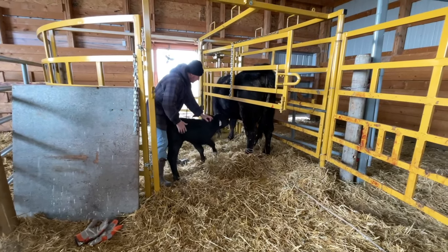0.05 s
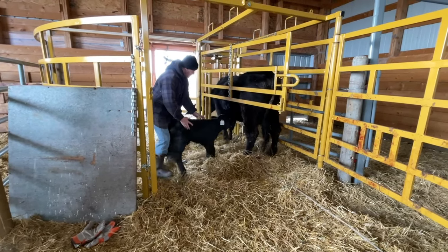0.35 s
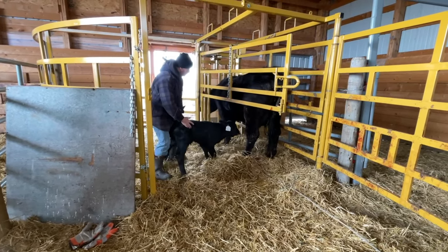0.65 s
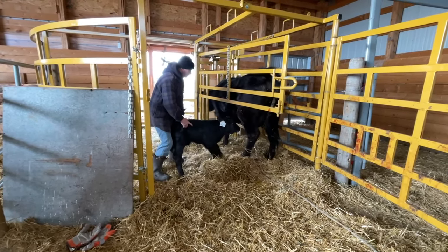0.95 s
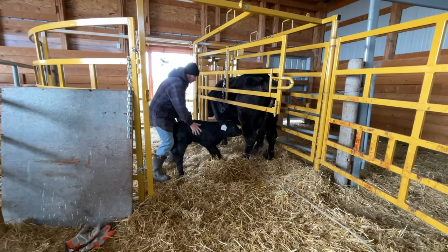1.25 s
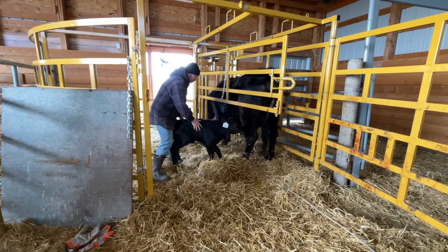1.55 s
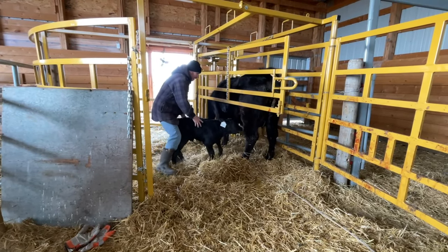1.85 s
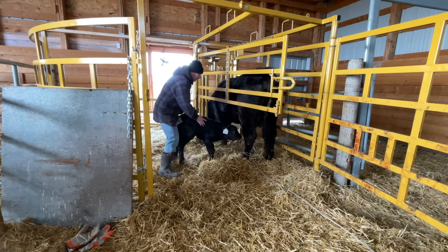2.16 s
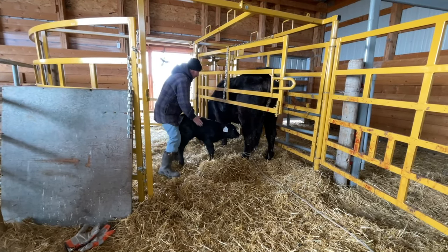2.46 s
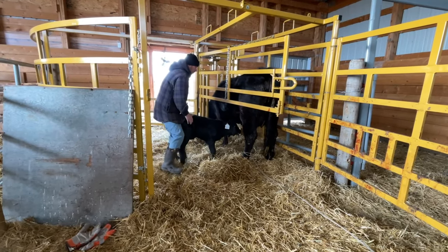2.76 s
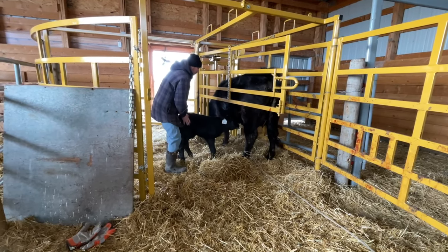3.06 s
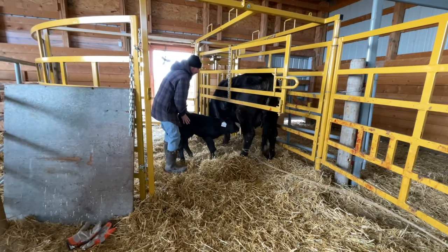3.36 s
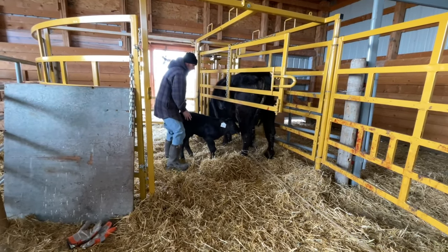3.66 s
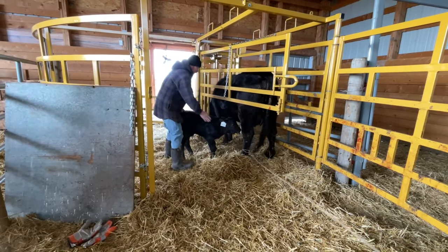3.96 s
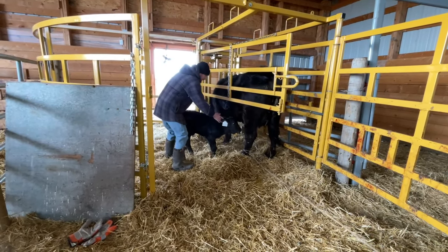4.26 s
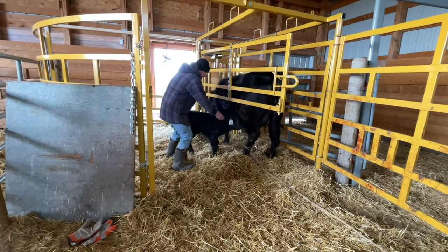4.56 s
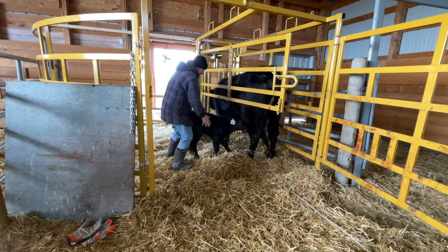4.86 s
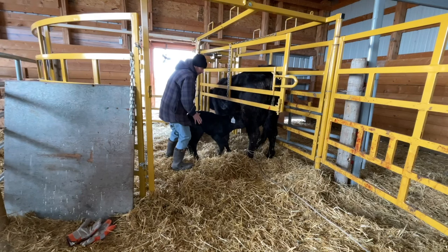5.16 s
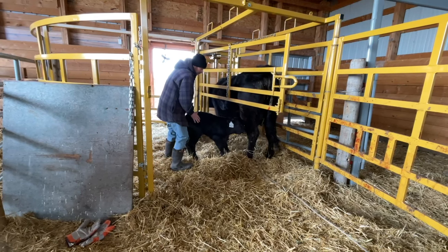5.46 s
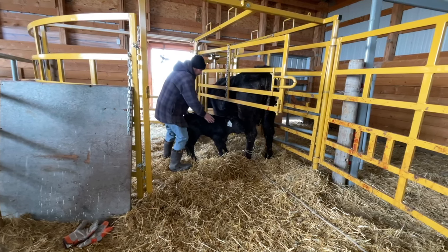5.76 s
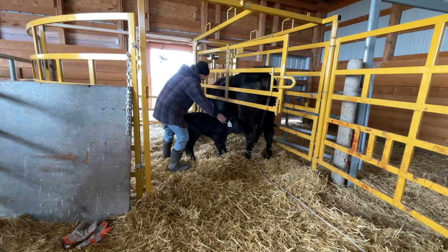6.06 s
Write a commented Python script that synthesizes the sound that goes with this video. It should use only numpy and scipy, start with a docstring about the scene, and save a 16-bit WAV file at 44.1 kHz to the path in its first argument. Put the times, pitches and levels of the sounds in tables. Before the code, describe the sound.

Irregular ringing clanks from a metal pen gate, with dull hoof thuds, crunching straw and a swishing coat in a barn.

```python
"""A tubular steel gate clanks, booms and jingles its chain as a penned cow shifts against it,
a few metres from a stereo microphone in a wooden barn. Each blow rattles the joints and rings the tubes.
A person nudges a calf towards the cow: boots and hooves thud and stir the straw, a coat swishes,
and a hinge squeaks briefly. Far birds chirp faintly over a low hum and the air of the barn."""
import sys
import numpy as np
from scipy import signal
from scipy.fft import rfft, irfft, next_fast_len
from scipy.io import wavfile

SR = 44100
rng = np.random.default_rng(int(sys.argv[2]) if len(sys.argv) > 2 else 0)


def persist_wave(psi):
    """Save psi, clipped to +-1, as 16-bit WAV."""
    counts = np.round(np.clip(psi, -1, 1) * 32767).astype(np.int16)
    wavfile.write(sys.argv[1], SR, np.atleast_2d(counts).T)


N = 273861
TIME = np.arange(N) / SR
RING_TIME = TIME[:SR * 2 // 3]  # seconds since a blow

# steel knocks on steel: start_s, strength_db, weight_db (extra bass), hardness_db (extra treble), part_hz
CLANKS = [(0.352, -54, 5.5, 11.5, 1330), (0.55, -31, -1.5, -7, 3000), (0.556, -24, 7.5, 0, 1465),
          (0.578, -39, 13, 8, 1572), (0.831, -44, -16.5, -6, 2337), (0.915, -40.5, 8, -0.5, 4100),
          (1.005, -40, 4.5, -13, 1470), (1.124, -36, 10, -14, 1430), (1.147, -30, -6, -6.5, 2210),
          (1.794, -39, 4.5, 8, 4000), (1.801, -30, -5.5, -3, 5160), (1.858, -34, 2.5, -3.5, 5560),
          (2.035, -47.5, 10.5, 0.5, 2330), (2.958, -36.5, -1, -11.5, 5170), (3.038, -39.5, -1, 2.5, 1470),
          (3.330, -36.5, -3.5, 3.5, 4110), (3.476, -38.5, 4, 1, 2910), (4.274, -32.5, -6, -4.5, 6700),
          (4.302, -38, -3.5, 8.5, 4980), (4.317, -34.5, -1.5, -2, 3680), (4.344, -35.5, 8, -3, 2400),
          (4.384, -29.5, 5.5, -9, 10400), (4.396, -37, 13.5, -16.5, 3880), (4.71, -40, 8, -0.5, 674),
          (5.226, -52, 1, 3, 3200), (5.668, -62, 10, 4, 1100)]
# the spectrum all clanks share, per octave band: frequency_hz, level_db
STEEL_SPECTRUM = [(60, -47.5), (200, -25.5), (520, -18.5), (850, -13), (2100, -2), (4300, 0.5), (6000, 0),
                  (9500, -7), (14000, -10.5)]
# where a blow's weight acts: frequency_hz, share
WEIGHT_SHARE = [(850, 1), (2100, 0)]
# where a blow's hardness acts: frequency_hz, share
HARDNESS_SHARE = [(2100, 0), (4300, .35), (9500, 1)]
# stronger blows leave the joints rattling longer: strength_db, t60_s
RATTLE_DECAY = [(-59, 0.042), (-52, 0.098), (-19.5, 0.15)]
# modes of the gate's tubes: pitch_hz, level_db, t60_s
TUBE_MODES = [(409, -8, 0.82), (773, 2.5, 0.47), (803, -0.5, .35), (878, -5, 0.06), (1270, 2, 0.33),
              (1452, -1.5, 0.5), (1495, 4, 0.17), (2170, 2, 0.25), (2337, -1.5, 0.6), (3580, -8, 0.37),
              (3812, -13.5, 0.25), (4340, -6, 0.49), (4912, -11, 0.49)]
# the gate's colour across the stereo image: frequency_hz, left_minus_right_db
GATE_BALANCE = [(500, -1.5), (1500, 1), (2400, -1.5), (4000, 4.5), (8000, 1), (12000, -2)]
# sudden contacts crack or tap: start_s, level_db, low_hz, high_hz, t60_s, left_minus_right_db
CRACKS = [(0.556, -12.5, 620, 1310, .025, -1.5), (0.556, -5.5, 3600, 5000, 0.016, 0),
          (0.585, -14, 630, 1030, 0.012, 8.5), (0.831, -24.5, 1800, 4800, .03, -9),
          (1.076, -27, 845, 1860, 0.11, -2), (1.148, -22, 1200, 3200, 0.11, -2),
          (1.147, -25, 6000, 13300, .02, 1), (1.801, -30, 5000, 12500, 0.027, -2),
          (3.036, -36, 5500, 13000, 0.013, 1), (3.328, -25.5, 3760, 6400, 0.07, 2),
          (3.333, -39.5, 1170, 1790, 0.35, -6), (3.613, -28.5, 560, 1080, 0.072, -0.5),
          (4.273, -22.5, 720, 5230, 0.04, -3), (4.383, -16.5, 6500, 13000, 0.015, -4),
          (4.396, -15.5, 437, 970, 0.015, 6), (4.394, -18, 3570, 4200, 0.022, 2),
          (4.709, -9.5, 4230, 11700, 0.026, -1.5), (4.716, -32, 635, 1520, 0.14, -10),
          (4.748, -25, 617, 1050, 0.076, 10), (6.004, -47.5, 492, 1120, 0.25, 1)]
# modes of the loose steel parts, by part name: pitch_hz, level_db, t60_s
PART_MODES = {"two-tone": [(3282, 0, 0.52), (4177, 1.5, 0.38)], "pure": [(3759, -1, 0.65), (3615, -14, .8),
              (5219, -15, .4)], "hook": [(2335, 0, 0.2)], "bolt": [(4890, 0, .2), (6850, -2, .18),
              (5700, -2, .16)], "bar": [(1440, 0, .25)], "staple": [(4183, 0, .3), (3282, -10, .3)],
              "post": [(775, 0, .35), (2315, 2, .22), (4183, -5, .2), (4290, -4, .5), (4915, -11, .55)],
              "latch": [(1717, -13, .37), (3085, -10, .18), (3960, -4, .14), (4070, 0, .18),
              (4533, -13, .38), (5227, -4, .18)], "shackle": [(4285, -8, .6), (5620, 0, .18),
              (6928, -1, .26), (11080, -4, .14), (11430, -6, .25)], "pin": [(1922, -2, .3), (7720, -2, .25),
              (8010, -2, .2), (8161, 0, .33), (9426, -3, .35), (9560, -3, .2)]}
# the chain and latch jerk: start_s, part_name, level_db, free_swing_s
CHAIN_AND_LATCH_CLINKS_AGAINST_THE_GATE = [(0.554, "hook", -16, 0.034), (0.556, "post", -26, .25),
                                           (0.831, "pure", -37.5, .2), (0.831, "hook", -35.5, .05),
                                           (0.913, "staple", -31.5, 0.08), (1.801, "pure", -25, 0.45),
                                           (1.801, "two-tone", -49, 0.053), (1.857, "two-tone", -32, 0.18),
                                           (2.032, "two-tone", -46, 0.12), (2.048, "hook", -40.5, .06),
                                           (2.964, "pure", -35.5, 0.29), (3.04, "pure", -39.5, .14),
                                           (3.045, "two-tone", -33.5, 0.2), (3.329, "latch", -30, 0.092),
                                           (3.482, "two-tone", -36.5, .16), (4.275, "hook", -33, .09),
                                           (4.275, "bolt", -39, .03), (4.303, "bolt", -32, .06),
                                           (4.312, "two-tone", -30, 0.03), (4.335, "pure", -29, 0.082),
                                           (4.343, "bar", -29, 0.04), (4.71, "shackle", -39.5, .2),
                                           (5.226, "pin", -48.5, .12)]
# dull blows of hooves and bodies on floor and pen: start_s, level_db, pitch_hz, t60_s
THUDS = [(0.0, -48.5, 300, 0.14), (0.399, -36.5, 176, 0.14), (0.583, -29.5, 295, 0.43),
         (0.592, -33, 186, 0.2), (1.140, -42.5, 300, 0.99), (1.223, -43, 245, 0.13), (1.524, -45, 86, 0.14),
         (1.811, -40, 159, 0.4), (1.874, -35.5, 153, 0.12), (2.046, -45, 115, 0.28),
         (2.882, -37.5, 290, 0.13), (2.897, -30, 191, 0.12), (3.418, -35.5, 205, 0.29),
         (3.480, -39.5, 80.4, 0.17), (3.615, -44, 218, 0.5), (4.396, -32.5, 216, 0.38),
         (4.402, -32.5, 385, 0.34), (4.786, -31.5, 86, 0.091), (4.894, -34, 265, 0.28),
         (5.119, -47, 253, 0.18), (5.678, -54, 270, 0.3)]
# low resonances of the pen and floor: centre_hz, width_hz, level_db
PEN_RESONANCES = [(76, 26.6, 2.5), (167, 81, 1.5), (245, 77, -4), (330, 40, -23.5), (392, 69, -5)]
# how busily the feet stir the bedding: time_s, level_db
STIR = [(0.0, -52), (0.4, -60.5), (0.76, -45.5), (1.19, -41.5), (1.35, -52.5), (1.64, -47.5), (1.93, -46.5),
        (2.68, -57.5), (3.4, -52.5), (3.52, -46.5), (3.99, -50.5), (4.32, -48.5), (4.44, -63), (4.8, -42),
        (4.97, -56.5), (6.2, -64)]
# a boot or hoof sinks into the straw or drags through it: start_s, level_db, length_s, t60_s
TREADS = [(0.06, -48, 0.025, 0.21), (0.337, -45.5, 0.033, 1.5), (1.136, -33, 0.017, 0.96),
          (2.28, -51, 0.069, 1.7), (2.905, -47, 0.096, 0.61), (3.604, -42.5, 0.024, 1.3),
          (4.396, -31, 0.034, 0.55), (4.75, -42, 0.034, 0.54), (5.142, -52.5, .03, 2.06),
          (5.746, -62.5, 0.028, 0.78)]
# the stalks on top: frequency_hz, level_db
CRUNCH_SPECTRUM = [(300, 0.5), (750, 12.5), (1300, 8.5), (2200, 6.5), (3200, -0.5), (6000, -20.5)]
# the bedding below: frequency_hz, level_db
SHUFFLE_SPECTRUM = [(40, 0.5), (90, -3), (180, 4.5), (380, -1), (550, -23.5), (1200, -27)]
# the coat brushes past with each move of arm or body: start_s, length_s, end_level_db
COAT_STROKES = [(0.0, 0.0066, -41), (0.059, 0.33, -39.5), (0.74, .23, -44.5), (1.278, 0.23, -42.5),
                (1.622, 0.3, -42.5), (1.936, 0.24, -46.5), (2.452, 0.31, -57), (2.703, 0.16, -46),
                (3.09, 0.22, -50.5), (3.572, 0.11, -46.5), (3.67, 0.17, -50.5), (3.898, 0.21, -52),
                (4.578, 0.22, -44.5), (5.094, 0.23, -52), (5.297, 0.093, -50.5), (5.7, 0.32, -67.5)]
# rubbing cloth: frequency_hz, level_db
COAT_SPECTRUM = [(1500, -11), (3200, -6.5), (4800, -2), (7000, -8), (8300, -7), (9600, -2), (12000, -10),
                 (13500, 0)]
# single stalks snap: start_s, level_db, centre_hz
STALK_SNAPS = [(2.047, -29, 9500), (2.117, -47, 5300), (2.144, -48, 10000), (4.965, -47, 10500),
               (5.032, -45, 9000), (5.205, -50, 10500), (5.398, -42, 10000)]
# the pulses of the hinge's squeak: start_s, length_s, pitch_hz, level_db
SQUEAKS = [(1.548, 0.025, 673, -42), (1.605, 0.038, 664, -45.5), (1.677, 0.098, 678, -53.5)]
# far birds, and at the end a faint squeak near 2 kHz: start_s, length_s, start_hz, end_hz, level_db
CHIRPS = [(0.471, 0.06, 4650, 4800, -49), (4.122, 0.04, 3720, 3390, -56.5),
          (5.452, 0.041, 4300, 4820, -57.5), (5.515, 0.09, 3180, 3480, -60),
          (5.784, 0.085, 1963, 2130, -61)]
# the hum's two tones: pitch_hz, level_db
HUM_TONES = [(75, -62.5), (150.5, -71.5)]
# the hum swells and sinks: time_s, gain_db
HUM_SWELL = [(0, 3), (1.2, -1), (1.8, 4), (2.35, 2.5), (2.75, -6), (3.5, 4.5), (4.1, -4.5), (5.3, -3.5),
             (6.2, 4)]
# the barn's room tone: frequency_hz, level_db
AIR_SPECTRUM = [(20, -38), (45, 5.5), (70, 0.5), (110, -15), (300, -11), (1000, -43), (4000, -55.5),
                (13000, -53)]
# reverberation between the timber walls: frequency_hz, t60_s
BARN_DECAY = [(100, 0.51), (500, 0.79), (2000, 0.58), (5000, 0.48), (12000, 0.21)]
# the microphone's response: frequency_hz, gain_db
MIC_RESPONSE = [(30, -11), (70, 1), (5800, 0.5), (7000, 3), (10500, 3.5), (12000, 2.5), (13400, -4),
                (14300, -38.5)]


def gate(burst_db=11, burst_t60=0.016, rattle_db=1.97, tubes_db=-13):
    """Each clank, a few metres off: a burst, a rattle of loose joints, and ringing parts and tubes."""
    contacts, rings = np.zeros(N), np.zeros((2, N))
    for start, *blow in CLANKS:
        strength, weight, hardness, _ = blow
        rattle = amp(rattle_db) * fade(np.interp(strength, *np.transpose(RATTLE_DECAY)))
        rise_s = 0.00091 * 2 ** (-min(hardness, 0) / 11)  # a softer contact builds up more slowly
        force = (rattle + amp(burst_db) * fade(burst_t60)) * rise(rise_s)
        response = lambda hz: amp(clank_db(hz, *blow)) * np.sqrt(SR / (2 * np.log(2) * hz))
        add(contacts, start, filtered(grains(len(RING_TIME), spread_db=3.5) * force, response))
        add(rings, start, loose_part(blow))
        # a heavy blow rings the tubes more; a soft one spares their high modes
        tubes = sum(amp(db + min(hardness, 0) * along(HARDNESS_SHARE, hz)) * mode(hz, t60)
                    for hz, db, t60 in TUBE_MODES)
        add(rings, start, amp(tubes_db + strength + weight) * tubes)
    sound = barn(contacts, wet_db=10, build_s=0.0008) + rings
    return filtered(sound, lambda hz: amp(np.outer([.5, -.5], along(GATE_BALANCE, hz))))


def clank_db(hz, strength, weight, hardness, part_hz, part_db=7, part_width=0.16):
    """A blow's spectrum: heavy ones add bass, hard ones treble, and the struck part its resonance."""
    tilt = weight * along(WEIGHT_SHARE, hz) + hardness * along(HARDNESS_SHARE, hz)
    resonance = part_db / (1 + (np.log(hz / part_hz) / part_width) ** 2)
    return strength + along(STEEL_SPECTRUM, hz) + tilt + resonance


def loose_part(blow, overtone_db=-12, note_db=-10, t60=.18):
    """A struck bolt, hook or link rings briefly with its own note and a scatter of high overtones."""
    part_hz = blow[-1]
    overtones = np.exp(rng.uniform(np.log(3000), np.log(13000), 12))
    ring = sum(amp(overtone_db + clank_db(hz, *blow)) * mode(hz, t60) for hz in overtones)
    return ring + amp(note_db + clank_db(part_hz, *blow)) * mode(part_hz, t60)


def mode(hz, t60):
    """One mode of struck steel, reaching left and right in different phases."""
    phase = rng.uniform(0, 2 * np.pi) + np.array([[0], [np.pi / 3]])
    return np.sin(2 * np.pi * hz * RING_TIME + phase) * fade(t60) * rise(0.00057)


def cracks():
    """The first instant of a hard contact: a compact burst that arrives ahead of the walls' answer."""
    out = np.zeros((2, N))
    for start, db, low_hz, high_hz, t60, pan_db in CRACKS:
        band = signal.butter(3, [low_hz, high_hz], "bandpass", fs=SR, output="sos")
        noise = rng.standard_normal(len(RING_TIME)) * fade(t60) * rise(0.000094)
        burst = signal.sosfilt(band, noise + 1e-18)
        gains = amp(db + np.array([[.5], [-.5]]) * pan_db)
        add(out, start, gains * burst / np.abs(burst).max())
    return barn(out, wet_db=-2, build_s=0.0042)


def chain(gain_db=0.5, beat_hz=13, twin_db=-17, muffle_t60=0.17):
    """Links and latch ring in close pairs of tones, wavering as they swing, until they fall together."""
    out = np.zeros((2, N))
    for start, part, strength, free_s in CHAIN_AND_LATCH_CLINKS_AGAINST_THE_GATE:
        muffle = amp(-60 * np.maximum(RING_TIME - free_s, 0) / muffle_t60)
        for hz, db, t60 in PART_MODES[part]:
            ring = mode(hz, t60) + amp(twin_db) * mode(hz + beat_hz, t60)
            add(out, start, amp(strength + db + gain_db) * ring * muffle)
    return out * amp(np.array([wander(40), wander(46)]))


def boom(hz, floor_db=-13.5):
    """The gain of the pen and floor: low resonant peaks over a flat base."""
    peaks = sum(amp(db) ** 2 / (1 + (2 * (hz - centre) / width) ** 4)
                for centre, width, db in PEN_RESONANCES)
    return np.sqrt(amp(floor_db) ** 2 + peaks)


def thuds(gain_db=4.5, swing_db=2):
    """Soft, heavy contacts: a few clean swings of the thing hit, with the pen booming around them."""
    out = np.zeros(N)
    # the spectrum around a thud's pitch: frequency_ratio, level_db
    shape = [(1 / 8, -34), (1 / 3, -14), (1, 0), (1.6, -2), (2.4, -10), (8, -35), (30, -65)]
    for start, db, pitch_hz, t60 in THUDS:
        noise = rng.standard_normal(len(RING_TIME))
        body = filtered(noise, lambda hz: boom(hz) * amp(along(shape, hz / pitch_hz)))
        push = fade(t60) * rise(0.0056)
        body = unit(body * push) * np.sqrt(np.mean(push ** 2))
        swing = np.sqrt(2) * np.sin(2 * np.pi * pitch_hz * RING_TIME) * push * fade(0.14)
        add(out, start, amp(db + gain_db) * (body + amp(swing_db) * swing))
    return out


def straw(stir_db=-2, deep_tread_db=-4.5, attack_s=0.034):
    """Restless feet and single treads crunch the stalks and shuffle dully deep in the bedding."""
    stir = amp(stir_db + np.interp(TIME, *np.transpose(STIR)))
    steps = [amp(db) * gesture(start, attack_s, length, t60) for start, db, length, t60 in TREADS]
    treads = np.linalg.norm(steps, axis=0)
    top, deep = np.hypot(stir, treads), np.hypot(stir, amp(deep_tread_db) * treads)
    crunch = rustle(CRUNCH_SPECTRUM, top, grain_db=2.5, flicker_db=2.1)
    shuffle = rustle(SHUFFLE_SPECTRUM, deep, grain_db=1, flicker_db=2)
    return crunch + shuffle


def coat(attack_s=0.046, t60=0.41, grow_db_per_s=23.5, rest_db=-74.5):
    """Each stroke of the cloth gathers speed and stops, and sets off a light crackle."""
    strokes = [amp(db) * gesture(start, attack_s, length, t60, grow_db_per_s)
               for start, length, db in COAT_STROKES]
    level = np.hypot(np.linalg.norm(strokes, axis=0), amp(rest_db))  # cloth never lies quite still
    return rustle(COAT_SPECTRUM, level, grain_db=2, flicker_db=0.4) + crackle(level)


def rustle(spectrum, level, grain_db, flicker_db):
    """Countless stalks and fibres slip past each other in uneven spurts."""
    friction = diffuse(grains(N, grain_db), grains(N, grain_db))
    return unit(colour(friction, spectrum)) * level * amp(flicker_db * wander(28))


def crackle(level, ticks_per_s=120, gain_db=1.5, spread_db=3, low_hz=4500, high_hz=12000):
    """Stalks and creases tick at random, as loud as the move that bends them; a few snap on their own."""
    out = np.zeros((2, N))
    for when, rank, pitch, pan in rng.random((int(ticks_per_s * N / SR), 4)):
        peak = level[int(when * N)] * amp(gain_db - spread_db * np.log(max(rank, .1)))
        tick = snap(low_hz * (high_hz / low_hz) ** pitch)
        sides = np.sqrt(2 * np.array([[pan], [1 - pan]]))
        add(out, when * N / SR, peak * tick * sides)
    for start, db, hz in STALK_SNAPS:
        add(out, start, amp(db) * snap(hz))
    return barn(out, wet_db=-3.5)


def snap(centre_hz, t60=0.01, octaves=0.27, size=512):
    """One dry tick, with a peak of 1."""
    burst = rng.standard_normal(size) * fade(t60)[:size]
    tick = filtered(burst, lambda hz: 1 / (1 + (np.log2(hz / centre_hz) / octaves) ** 2))
    return tick / np.abs(tick).max()


def hinge():
    """The hinge sings low and nearly steady, in a few quick pulses."""
    out = np.zeros(N)
    for start, length, hz, db in SQUEAKS:
        add(out, start, amp(db) * whistle(length, hz, hz, unsteady=0.04))
    return out


def birds():
    """Short buzzy notes, far from the microphone."""
    out = np.zeros(N)
    for start, length, start_hz, end_hz, db in CHIRPS:
        add(out, start, amp(db) * whistle(length, start_hz, end_hz, unsteady=0.11))
    return out


def whistle(length, start_hz, end_hz, unsteady):
    """A short gliding tone with an unsteady pitch."""
    size = int(length * SR)
    hz = np.linspace(start_hz, end_hz, size) * (1 + unsteady * wander(600)[:size])
    return np.sin(2 * np.pi * np.cumsum(hz) / SR) * np.hanning(size) * 2


def hum(waver_db=3.7, drift_rad=0.5):
    """A low background hum that wavers and swells."""
    swell_db = np.interp(TIME, *np.transpose(HUM_SWELL))
    out = np.zeros(N)
    for hz, db in HUM_TONES:
        level = np.sqrt(2) * amp(db + swell_db + waver_db * wander(5.7))
        out += level * np.sin(2 * np.pi * hz * TIME + drift_rad * wander(26))
    return out


def air(level_db=-61):
    """Room tone: the barn's faint rumble and hiss, all around the microphone."""
    return amp(level_db) * unit(colour(diffuse(*rng.standard_normal((2, N))), AIR_SPECTRUM))


def barn(x, wet_db, build_s=0.0072):
    """The direct sound, then a wash from the timber walls that dulls as it dies."""
    noise, tail = diffuse(*rng.standard_normal((2, len(RING_TIME)))), 0
    octaves_hz = 2. ** np.arange(6, 15)
    for centre in octaves_hz:
        band = filtered(noise, lambda hz: np.interp(np.log(hz), np.log(octaves_hz), octaves_hz == centre))
        tail = tail + band * fade(along(BARN_DECAY, centre))
    tail = unit(tail * rise(build_s)) / np.sqrt(len(RING_TIME))
    x = np.broadcast_to(x, (2, N))
    direct = np.array([np.roll(x[0], 3), x[1]])  # reaches the left side 3 samples later
    wash = signal.fftconvolve(x, tail, axes=1)[:, :N]
    return (direct + amp(wet_db) * wash) / np.hypot(1, amp(wet_db))


def diffuse(mid, side, apart_hz=430):
    """Sound from all around: long waves reach both channels alike, short ones do not."""
    share = lambda hz: .5 * (hz ** 2 + (apart_hz / 5) ** 2) / (hz ** 2 + apart_hz ** 2)
    mid = filtered(mid, lambda hz: np.sqrt(1 - share(hz)))
    side = filtered(side, lambda hz: np.sqrt(share(hz)))
    return np.array([mid + side, mid - side])


def gesture(start, attack_s, length, t60, grow_db_per_s=0):
    """Envelope of one movement: it sets in, holds or grows over its length, then dies away."""
    past_end = TIME - start - length
    db = grow_db_per_s * np.minimum(past_end, 0) - 60 * np.maximum(past_end, 0) / t60
    return np.clip((TIME - start) / attack_s, 0, 1) * amp(db)


def grains(size, spread_db):
    """Dense tiny impacts of unequal strength."""
    return unit(rng.standard_normal(size) * amp(spread_db * np.minimum(rng.exponential(size=size), 7)))


def wander(rate_hz):
    """A random drift with a spread near 1."""
    knots = rng.standard_normal(int(N / SR * rate_hz) + 2)
    return np.interp(TIME * rate_hz, np.arange(len(knots)), knots)


def rise(rise_s):
    """The build-up after a blow, from 0 towards 1."""
    return 1 - np.exp(-RING_TIME / rise_s)


def fade(t60):
    """The decay after a blow: 60 dB in t60 seconds."""
    return np.exp(-np.log(1000) * RING_TIME / t60)


def amp(db):
    """Decibels to gain."""
    return 10 ** (np.asarray(db) / 20)


def unit(x):
    """Scale to an rms of 1."""
    return x / np.sqrt(np.mean(x ** 2))


def add(track, start_s, sound):
    """Mix a sound into a track from start_s on."""
    start = int(start_s * SR)
    track[..., start:start + sound.shape[-1]] += sound[..., :N - start]


def along(points, hz):
    """Read (frequency_hz, value) points on a log-frequency axis."""
    frequencies, values = np.transpose(points)
    return np.interp(np.log(hz), np.log(frequencies), values)


def filtered(x, response):
    """Apply a gain that is a function of frequency."""
    size = next_fast_len(x.shape[-1] + 2048)
    hz = np.maximum(np.arange(size // 2 + 1) * SR / size, 1)
    return irfft(rfft(x, size) * response(hz), size)[..., :x.shape[-1]]


def colour(x, points):
    """Shape a sound with a (frequency_hz, gain_db) curve."""
    return filtered(x, lambda hz: amp(along(points, hz)))


def scene(hush_s=6.1, hush_db_per_s=83, lean_db=.75):
    """The pen's long side stands to the right of the microphone, so that channel gets a little more."""
    hush = amp(-hush_db_per_s * np.maximum(TIME - hush_s, 0))  # rustle and air die away at the end
    background = (straw() + coat() + air()) * hush + hum()
    pen = gate() + cracks() + chain() + barn(thuds(), wet_db=-5)
    faint_notes = barn(hinge() + birds(), wet_db=-1)
    return (pen + faint_notes + background) * amp([[-lean_db], [lean_db]])


def record(dry, ceiling=.95, top_hz=15700):
    """The microphone's colour, a soft ceiling on the peaks, and the recorder's top cut."""
    sound = ceiling * np.tanh(colour(dry, MIC_RESPONSE) / ceiling)
    return signal.sosfilt(signal.ellip(8, .2, 70, top_hz, fs=SR, output="sos"), sound)


dry = scene()
out = record(dry)
persist_wave(out)
```